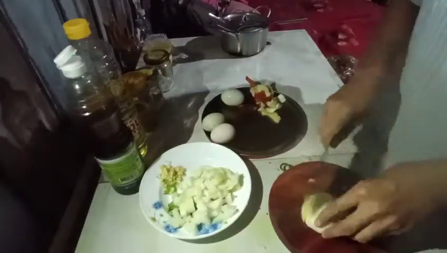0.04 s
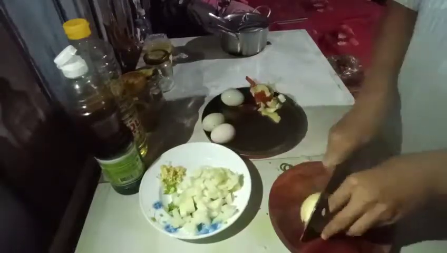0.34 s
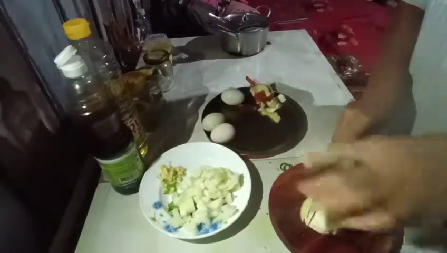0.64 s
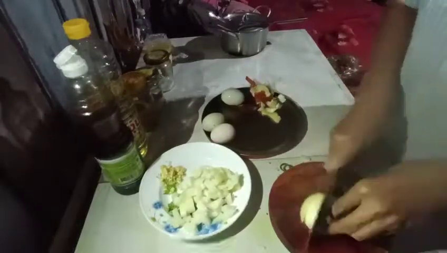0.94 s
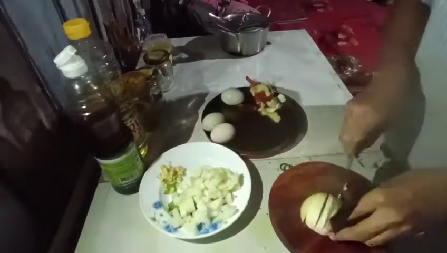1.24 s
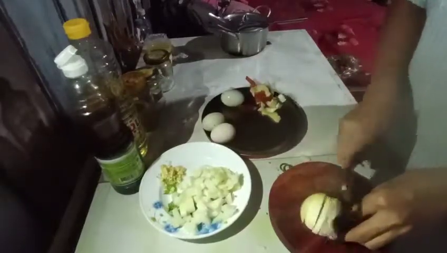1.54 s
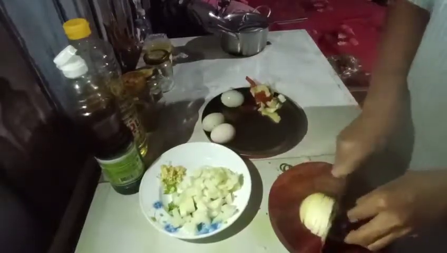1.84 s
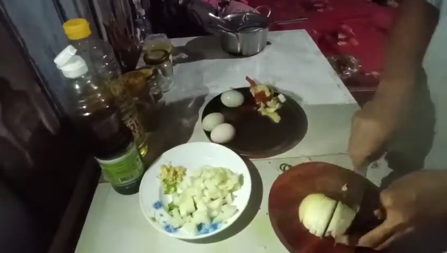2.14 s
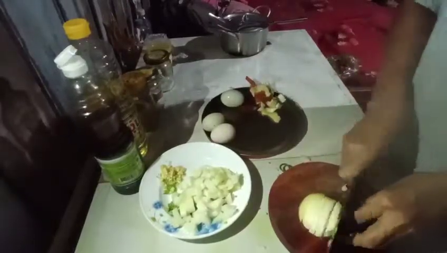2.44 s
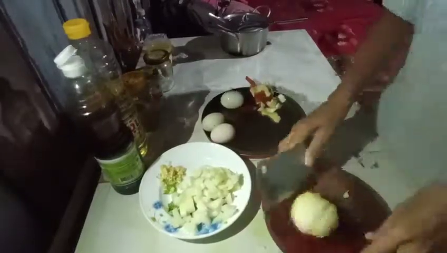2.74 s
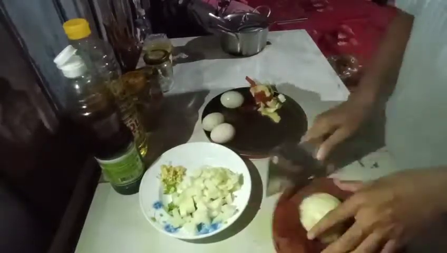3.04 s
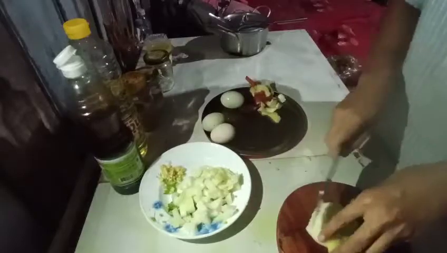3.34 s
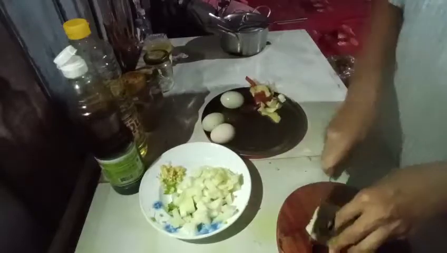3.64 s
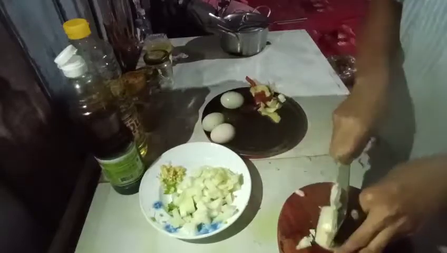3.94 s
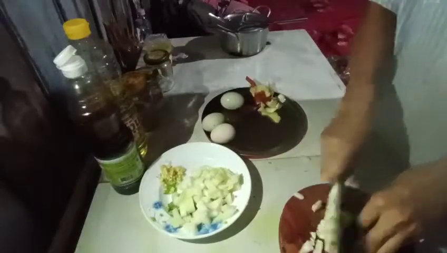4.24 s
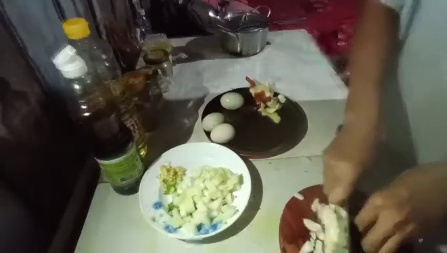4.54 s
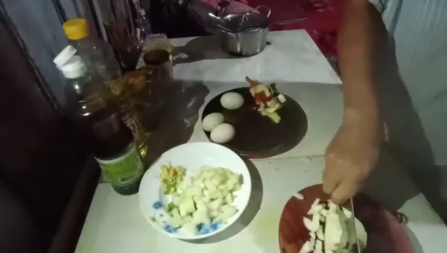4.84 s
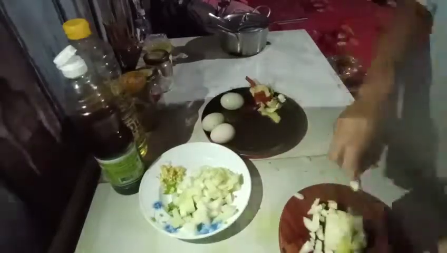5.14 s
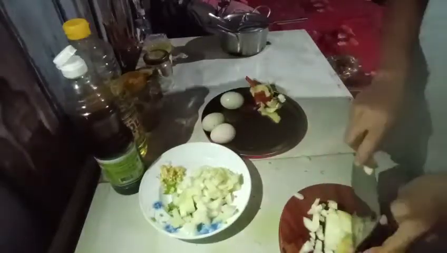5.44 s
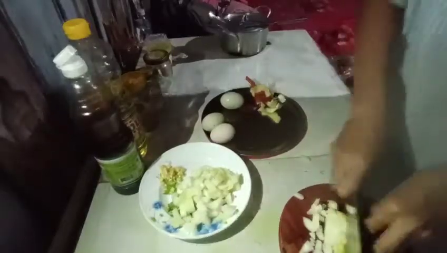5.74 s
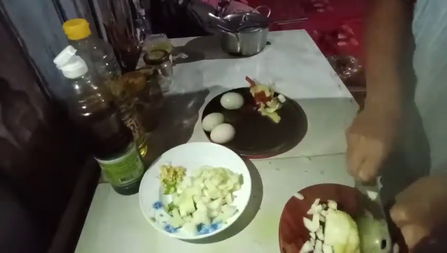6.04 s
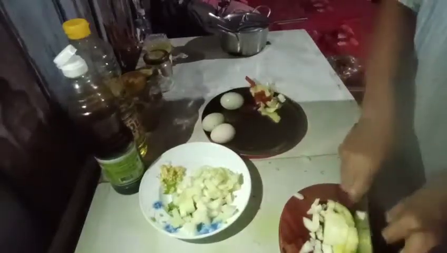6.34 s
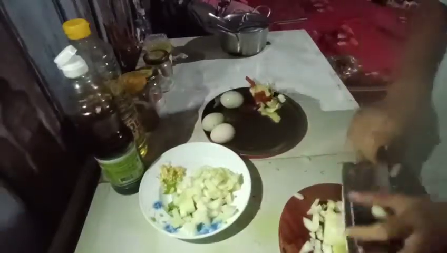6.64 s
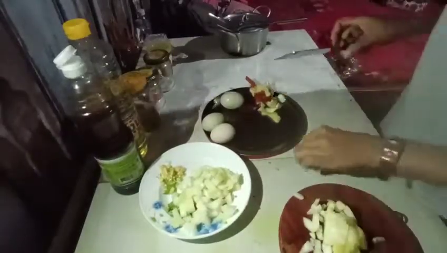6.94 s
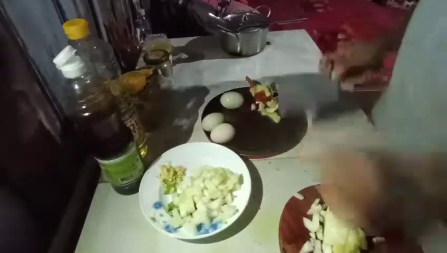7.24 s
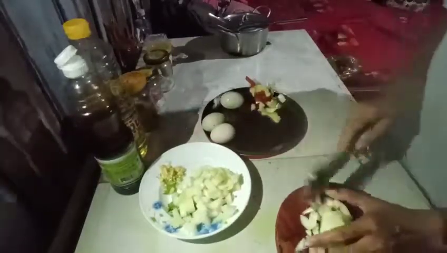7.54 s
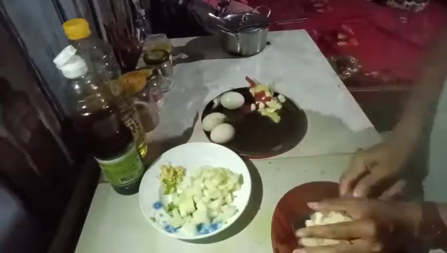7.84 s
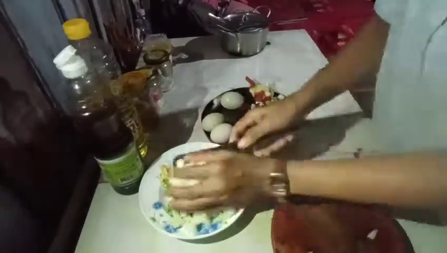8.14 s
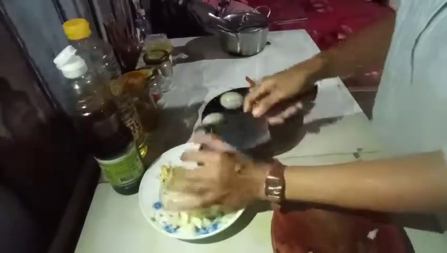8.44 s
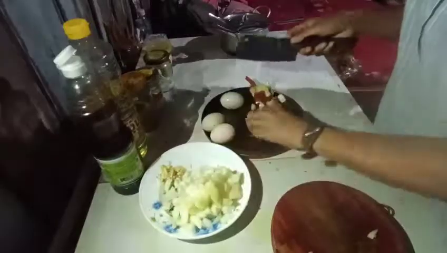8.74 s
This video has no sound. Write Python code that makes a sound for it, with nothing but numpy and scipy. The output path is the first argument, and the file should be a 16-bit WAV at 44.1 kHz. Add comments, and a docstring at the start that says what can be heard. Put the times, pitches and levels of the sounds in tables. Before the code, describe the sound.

Frogs croak without a break outside a small kitchen at night, their quick buzzy calls standing out over a wider rattling chorus. Faint crickets shimmer behind them, and a katydid rasps in two runs. Close to the microphone, a cleaver slices an onion with light crunches and soft, irregular knocks on a wooden board, the loudest just past the middle. Near the end a distant engine faintly speeds up.

```python
"""Frogs croak in near unison outside a small kitchen at night, a wider chorus and insects behind them.
Each croak is a buzz of about a hundred pulses a second through a low and a high throat resonance.
A katydid rasps its wings in two runs. Close by, a cleaver slices an onion and knocks softly on a
wooden board. Night air and mains hum lie underneath; near the end a far engine pulls away."""
import sys
import numpy as np
from scipy import signal
from scipy.fft import rfft, irfft
from scipy.io import wavfile
from scipy.ndimage import map_coordinates

SR = 44100
rng = np.random.default_rng(int(sys.argv[2]) if len(sys.argv) > 2 else 0)


def dump(signal):
    """Clip the signal to [-1, 1] and save it as 16-bit WAV at the path in sys.argv[1]."""
    limited = np.clip(np.atleast_2d(signal).T, -1, 1)
    pcm = np.round(limited * 32767).astype(np.int16)
    wavfile.write(sys.argv[1], SR, pcm)


N = 396900
TIME = np.arange(N) / SR


def from_db(db):
    """Decibels to gain."""
    return 10 ** (np.asarray(db) / 20)


def unit_rms(x):
    """Scale to rms 1."""
    return x / np.sqrt(np.mean(x ** 2) + 1e-20)


def per_bin(points):
    """An (f/Hz, value) table at every FFT bin, interpolated on log f."""
    hz, value = np.transpose(points)
    return np.interp(np.log(np.arange(N // 2 + 1) * SR / N + 1e-9), np.log(hz), value)


def colour(x, curve):
    """Filter by an (f/Hz, gain/dB) curve; rms 1."""
    return unit_rms(irfft(rfft(x) * from_db(per_bin(curve)), N))


def drift(knots_per_s):
    """Slow random wander; rms 1."""
    knots = rng.standard_normal(1024)
    return unit_rms(map_coordinates(knots, [TIME * knots_per_s], order=1, mode="wrap"))


def band(x, hz, width_hz):
    """Band-pass resonance; rms 1."""
    edges_hz = np.clip([hz - width_hz / 2, hz + width_hz / 2], 20, .45 * SR)
    return unit_rms(signal.sosfilt(signal.butter(2, edges_hz, "band", fs=SR, output="sos"), x + 1e-18))


def sine(hz):
    """Sine following a per-sample frequency; rms 1."""
    return np.sqrt(2) * np.sin(2 * np.pi * np.cumsum(hz) / SR)


def pulses(rate_hz, jitter):
    """One click a cycle; jitter is the timing spread in periods."""
    phase = rng.random() + np.cumsum(rate_hz) / SR
    slips = rng.standard_normal(2048)
    cycles = np.arange(1, int(phase[-1]) + 1)
    at = np.searchsorted(phase, cycles + jitter * slips[cycles % len(slips)])
    return np.bincount(at, minlength=len(phase) + 1)[:len(phase)].astype(float)


def add(out, sound, start_s):
    """Mix a sound in at start_s."""
    i = int(round(start_s * SR))
    lo, hi = max(i, 0), min(i + sound.shape[-1], N)
    out[..., lo:hi] += sound[..., lo - i:hi - i]


def scatter(clicks, t60_s):
    """Each click becomes a decaying noise burst, different left and right; rms 1."""
    power = signal.lfilter([1], [1, -from_db(-120 / (t60_s * SR))], clicks ** 2 + 1e-18)
    return unit_rms(np.sqrt(power) * rng.standard_normal((2, len(clicks))))


def echoes(x, t60_s, wet_db):
    """Direct sound plus dense stereo reflections; power is kept."""
    t = TIME[:SR // 2]
    tail = rng.standard_normal((2, len(t))) * from_db(-60 * t / t60_s) * (t > .002)
    tail *= from_db(wet_db) / np.sqrt(np.sum(tail ** 2) / 2)
    wet = signal.fftconvolve(np.atleast_2d(x), tail, axes=-1)[:, :x.shape[-1]]
    return (x + wet) / np.sqrt(1 + from_db(2 * wet_db))


# air spectrum: f/Hz, relative density/dB
AIR_SPECTRUM = [(20, 6), (50, -0.5), (110, -1.5), (250, -5.5), (370, -8.5), (500, -5), (850, -5.5),
                (2000, -5), (4300, -12), (5300, -22), (8500, -17.5), (11500, -25), (13000, -24.5),
                (15500, -31.5)]
# left-right likeness of the air: f/Hz, correlation
AIR_CORRELATION = [(30, 0.64), (300, 0.76), (800, 0.88), (2000, .3), (5000, .3), (9000, 1), (15000, 1)]


def night_air(level_db=-54):
    """Soft, wide noise of air and far insects."""
    correlation = per_bin(AIR_CORRELATION)
    mid, side = rfft(rng.standard_normal((2, N)))
    stereo = np.sqrt(1 + correlation) * mid + np.sqrt(1 - correlation) * side * [[1], [-1]]
    return from_db(level_db) * colour(irfft(stereo, N), AIR_SPECTRUM)


# bush cricket band: f/Hz, relative density/dB
CRICKET_SPECTRUM = [(5300, -17.5), (6000, 0), (6650, 7), (7200, 0), (7700, -2), (8500, -33)]


def bush_crickets(level_db=-57, shimmer_db=1.5):
    """Distant crickets merge into a shimmering band of noise."""
    noise = rng.standard_normal((2, N)) + 0.25 * rng.standard_normal(N)
    return from_db(level_db + shimmer_db * drift(30)) * colour(noise, CRICKET_SPECTRUM)


# mains hum, far cricket: f/Hz, level/dB, waver/dB
STEADY_TONES = [(100, -67.7, 1.5), (2208, -60.5, 2.7)]


def hum_and_far_cricket(pitch_spread=0.00198):
    """Two thin tones, wavering in level and pitch."""
    return sum(from_db(db + waver_db * drift(10)) * sine(hz * (1 + pitch_spread * drift(40)))
               for hz, db, waver_db in STEADY_TONES)


def cricket_note(start_s=6.5, length_s=0.33, hz=2225, peak_db=-48):
    """One louder note of the far cricket swells and fades."""
    swell = np.sin(np.pi * np.clip((TIME - start_s) / length_s, 0, 1))
    return from_db(peak_db) * swell * sine(np.full(N, hz))


# engine envelope: t/s, level/dB
ENGINE_LEVELS = [(7.3, -90), (7.5, -64), (8.1, -65), (8.2, -59), (8.45, -54.5), (8.6, -58), (9.0, -64)]


def far_engine(start_hz=45.5, rise_hz_per_s=11.3):
    """An engine speeds up evenly; only its firing note carries this far."""
    times_s, levels_db = np.transpose(ENGINE_LEVELS)
    firing_hz = start_hz + rise_hz_per_s * np.maximum(TIME - times_s[0], 0)
    return from_db(np.interp(TIME, times_s, levels_db, left=-140)) * sine(firing_hz)


def croak_pulses(length_s, rate_hz, arch, jitter, sag=.012):
    """Pressure swells and sinks, lifting pulse strength and rate; the rate sags as air runs out."""
    progress = np.clip(TIME[:int((length_s + .07) * SR)] / length_s, 0, 1)
    pressure = np.maximum(np.sin(np.pi * progress), 0)
    bend = 1 + arch * (pressure - 2 / np.pi) - sag * (progress - .5)
    return pulses(rate_hz * bend, jitter) * pressure ** 0.64


# far chorus filter: f/Hz, relative gain/dB
CHORUS_CURVE = [(900, -42), (1020, -30), (1090, -6.5), (1290, 8), (1450, -3.5), (1700, -9.5), (1900, -11.5),
                (2150, 1), (2400, -7), (2900, 2), (3250, -11), (3700, -20), (4400, -22.5), (5400, -46.5)]


def far_frogs(level_db=-43.5, count=300):
    """Many frogs at random moments blur into a rattling chorus."""
    clicks = np.zeros(N)
    croaks = rng.uniform([-4, .12, 93, -2], [-1, .2, 106, 2], (count, 4))
    for slot, (offset, length_s, rate_hz, db) in enumerate(croaks):
        croak = from_db(db) * croak_pulses(length_s, rate_hz, arch=.03, jitter=.02)
        add(clicks, croak, (slot + offset) / count * TIME[-1])
    rattle = scatter(clicks, t60_s=0.1) + from_db(-6.5) * unit_rms(clicks)
    return from_db(level_db) * colour(rattle, CHORUS_CURVE)


# katydid chirps, two runs: t/s, length/s, relative level/dB
KATYDID_CHIRPS = [(0.595, 0.17, -53.5), (0.923, 0.19, -53), (1.296, 0.195, -52.5), (1.688, 0.2, -52.5),
                  (4.86, 0.18, -53), (5.19, 0.2, -53), (5.601, 0.185, -52), (5.975, 0.19, -52.5),
                  (6.355, 0.19, -52.5), (6.77, 0.2, -52), (7.182, 0.179, -52), (7.581, 0.181, -52.5)]


def katydid(wing_hz=7060, width_hz=420, stroke_hz=104, attack_s=.005, release_s=.025, swell_db=1.5):
    """Quick wing strokes scrape bursts of teeth across one wing resonance."""
    envelope, t = np.zeros(N), TIME[:SR // 3]
    for start_s, length_s, db in KATYDID_CHIRPS:
        gate = np.clip(np.minimum(t / attack_s, (length_s - t) / release_s + .5), 0, 1)
        add(envelope, gate * from_db(db + swell_db * np.sin(np.pi * t / length_s)), start_s)
    strokes = pulses(stroke_hz * (1 + 0.056 * drift(11)), jitter=0.11)
    song = envelope * band(scatter(strokes, t60_s=0.072), wing_hz, width_hz)
    return from_db([[3.5], [-1.5]]) * echoes(song, t60_s=0.25, wet_db=-2.5)  # left of centre


# blade parting onion layers: peak t/s, build-up/s, relative level/dB
ONION_SLICES = [(.616, 0.013, -62), (0.942, 0.067, -59.5), (1.607, 0.06, -57.5), (2.075, 0.074, -59),
                (2.44, 0.096, -62), (3.051, .07, -63), (4.359, .1, -67), (4.412, .02, -60.5),
                (4.791, 0.059, -57.5), (5.211, .04, -57), (6.53, .08, -71), (6.95, 0.072, -61)]


def onion_crunch(cracks_per_s=2000, gain_db=3, build_db=13, t60_s=0.042, lead_s=.15):
    """Cells burst in tiny cracks, louder as the blade sinks, dying away once it is through."""
    out, t = np.zeros(N), TIME[:SR // 5] - lead_s
    for peak_s, build_s, db in ONION_SLICES:
        cracks = (rng.random(len(t)) < cracks_per_s / SR) * rng.standard_normal(len(t))
        envelope = from_db(db + gain_db + np.minimum(build_db * t / build_s, -60 * t / t60_s))
        add(out, envelope * band(cracks, hz=9900, width_hz=13000), peak_s - lead_s)
    return out


# board and blade modes: f/Hz, relative level/dB, free t60/s
BOARD_MODES = [(113, -11, 0.082), (174, -11.5, 0.13), (288, -5.5, 0.05), (408, -2.5, 0.017),
               (521, -2, 0.062), (527, -15, 0.048), (666, -18, 0.069), (756, -9, 0.14), (950, -0.5, 0.026),
               (1950, -7, 0.033), (2440, -4, 0.052)]
# cleaver on the board: t/s, relative level/dB, ring-time factor (1 = free board), contact f/Hz
CLEAVER_KNOCKS = [(1.61, -46, 1, 300), (2.086, -50, 1.7, 403), (3.051, -41, 0.46, 380),
                  (4.408, -36.5, 0.52, 395), (4.774, -45, 1.1, 130), (5.208, -27.5, 0.6, 380),
                  (6.410, -43.5, 1.5, 483), (6.921, -33.5, 0.99, 560), (8.304, -39, 0.82, 440)]


def cleaver_knocks(falloff_db_per_oct=3, chatter_db=-7, clack_db=-8, clack_db_per_oct=14):
    """The blade lands, rings the board and chatters to rest; harder contacts clack much more."""
    out, t = np.zeros(N), TIME[:SR // 5]
    for start_s, db, ring, contact_hz in CLEAVER_KNOCKS:
        detune = rng.uniform(.97, 1.01)
        for k, (hz, mode_db, t60_s) in enumerate(BOARD_MODES):
            strength_db = db + mode_db - falloff_db_per_oct * abs(np.log2(hz / contact_hz))
            mode = (-1) ** k * np.sin(2 * np.pi * hz * detune * t)
            add(out, from_db(strength_db - 60 * t / (t60_s * ring)) * mode, start_s)
        chatter = band(rng.standard_normal(len(t)), hz=0.88 * contact_hz, width_hz=1.3 * contact_hz)
        add(out, from_db(db + chatter_db - 60 * t / (0.15 * ring)) * chatter, start_s)
        clack = band(rng.standard_normal(len(t)), hz=2500, width_hz=1700)
        hardness_db = clack_db_per_oct * np.log2(contact_hz / 500)
        add(out, from_db(db + clack_db + hardness_db - 60 * t / 0.098) * clack, start_s)
    return out


def vocal_sac(x, low_cut_hz=1040, high_cut_hz=5200):
    """A small sac radiates almost nothing below its lowest resonance, little far above its highest."""
    x = signal.sosfilt(signal.butter(12, low_cut_hz, "high", fs=SR, output="sos"), x)
    return signal.sosfilt(signal.butter(2, high_cut_hz, fs=SR, output="sos"), x)


# weak throat resonance: f/Hz, width/Hz, level/dB re the mean drive of the main two
WEAK_RESONANCES = [(1570, 270, -11.5)]
# near croaks, about 7 a second: t/s, length/s, relative level/dB, high over low resonance/dB, low f/Hz
NEAR_CROAKS = [(-0.063, 0.22, -40.5, 5, 1250), (0.079, 0.21, -41.0, 2, 1300), (0.267, 0.15, -40.5, 4, 1230),
               (0.381, 0.16, -39.5, 2, 1280), (0.536, 0.19, -41.0, 6, 1230), (0.701, 0.16, -40.0, 3, 1290),
               (0.838, 0.17, -41.0, 2, 1210), (0.988, 0.16, -46.5, 9, 1290), (1.156, 0.21, -41.0, 3, 1250),
               (1.332, 0.14, -41.0, 3, 1310), (1.434, 0.16, -40.5, 3, 1250), (1.574, 0.16, -39.0, 1, 1240),
               (1.695, 0.17, -39.0, 4, 1270), (1.882, 0.19, -40.5, 4, 1250), (2.026, 0.1, -40.5, 2, 1240),
               (2.123, 0.15, -38.0, 3, 1250), (2.26, 0.15, -38.0, 3, 1240), (2.395, 0.21, -40.5, 5, 1270),
               (2.567, 0.2, -38.0, 2, 1270), (2.744, 0.18, -42.5, 4, 1230), (2.892, 0.18, -44.0, 2, 1330),
               (3.056, 0.18, -45.5, 2, 1290), (3.17, 0.17, -48.5, 3, 1260), (3.34, 0.17, -45.0, 1, 1290),
               (3.514, 0.1, -40.5, 1, 1250), (3.618, 0.22, -41.0, 1, 1290), (3.854, 0.12, -41.5, 3, 1250),
               (3.967, 0.12, -37.5, 3, 1230), (4.035, 0.2, -39.0, 3, 1280), (4.199, 0.23, -40.0, 4, 1240),
               (4.383, 0.21, -41.0, 2, 1270), (4.592, 0.17, -39.0, 3, 1250), (4.729, 0.23, -41.0, 4, 1250),
               (4.932, 0.15, -36.5, 2, 1240), (5.018, 0.23, -42.0, 3, 1250), (5.231, 0.14, -42.0, 0, 1310),
               (5.318, 0.15, -39.5, 3, 1240), (5.445, 0.17, -45.0, 6, 1250), (5.593, 0.13, -40.0, 4, 1290),
               (5.691, 0.16, -40.5, 2, 1230), (5.832, 0.16, -42.0, 4, 1260), (5.961, 0.16, -42.0, 1, 1300),
               (6.091, 0.19, -40.0, 2, 1230), (6.26, 0.18, -42.5, 3, 1270), (6.407, 0.14, -43.5, 0, 1330),
               (6.515, 0.15, -47.0, 1, 1290), (6.654, 0.22, -49.0, 4, 1280), (6.891, 0.2, -46.0, 2, 1280),
               (7.023, 0.13, -44.0, 3, 1280), (7.163, 0.14, -38.0, 2, 1260), (7.276, 0.19, -42.0, 3, 1260),
               (7.453, 0.11, -41.0, 3, 1250), (7.544, 0.16, -38.0, 3, 1270), (7.669, 0.18, -40.5, 4, 1240),
               (7.837, 0.16, -38.5, 2, 1280), (7.995, 0.13, -38.5, 3, 1260), (8.096, 0.19, -39.0, 3, 1260),
               (8.237, 0.16, -46.5, 4, 1250), (8.366, 0.2, -40.5, 3, 1280), (8.498, 0.2, -38.5, 2, 1250),
               (8.646, 0.19, -45.5, 4, 1300), (8.752, 0.26, -43.0, 1, 1300)]


def near_frogs(gain_db=0.43, left_lag_s=.00034, scatter_db=-4.5, scatter_db_per_oct=5.5,
               brighten_db_per_oct=3):
    """Pulses ring each throat, brighten and arrive from the right; higher resonances scatter more."""
    out = np.zeros((2, N))
    for start_s, length_s, croak_db, bright_db, low_hz in NEAR_CROAKS:
        clicks = croak_pulses(length_s, rate_hz=rng.normal(98.7, 1.0), arch=.012, jitter=.011)
        direct = unit_rms(np.array([np.roll(clicks, int(left_lag_s * SR)), clicks]))
        scattered = scatter(clicks, t60_s=.07)
        progress = np.minimum(TIME[:len(clicks)] / length_s, 1)
        duty = length_s * SR / len(clicks)
        high_hz = 2962 * (low_hz / 1270) ** 0.58  # both resonances rise in a smaller frog
        # f/Hz, width/Hz, relative level/dB, leftward pan/dB
        throat = [(low_hz, 225, 0.35, 1.0), (high_hz, 444, bright_db + 0.4, -1.12)]
        throat += [(hz, width_hz, bright_db / 2 + db, 0) for hz, width_hz, db in WEAK_RESONANCES]
        for hz, width_hz, db, pan_db in throat:
            octaves = np.log2(hz / low_hz)
            paths = direct + scattered * from_db(scatter_db + scatter_db_per_oct * octaves)
            brightening = from_db(brighten_db_per_oct * octaves * (progress - .5))
            ringing = from_db(croak_db + db) * np.sqrt(duty) * band(paths * brightening, hz, width_hz)
            add(out, ringing * from_db([[pan_db], [-pan_db]]), start_s)
    return from_db(gain_db) * echoes(vocal_sac(out), t60_s=0.095, wet_db=0.5)


def scene():
    """Frogs and insects, the night background and the kitchen work."""
    callers = near_frogs() + far_frogs() + katydid()
    background = night_air() + bush_crickets() + hum_and_far_cricket() + cricket_note() + far_engine()
    return callers + background + cleaver_knocks() + onion_crunch()


def record(dry, cutoff_hz=15500):
    """Steep low-pass."""
    return signal.sosfilt(signal.ellip(10, .1, 80, cutoff_hz, fs=SR, output="sos"), dry)


dry = scene()
out = record(dry)
dump(out)
```